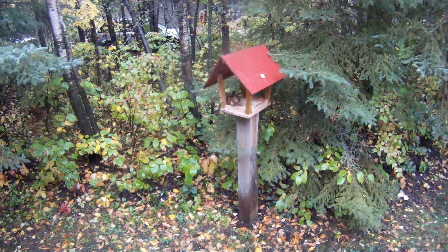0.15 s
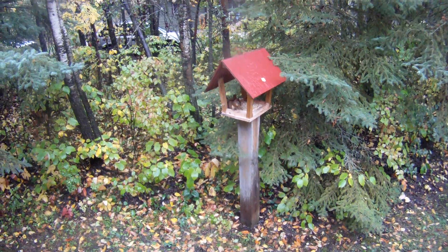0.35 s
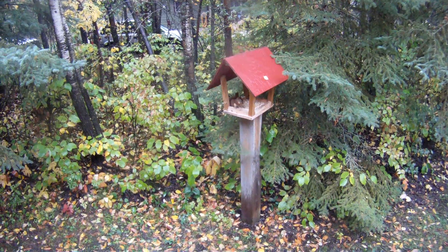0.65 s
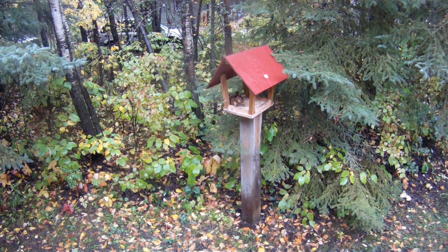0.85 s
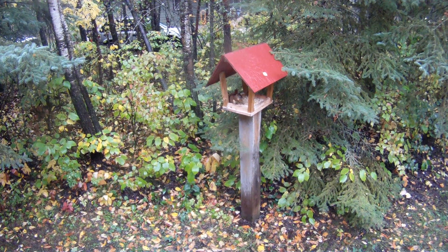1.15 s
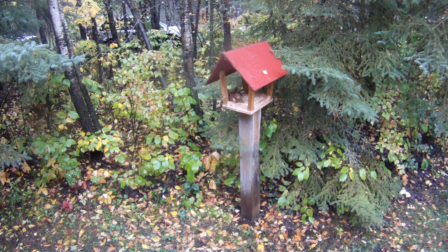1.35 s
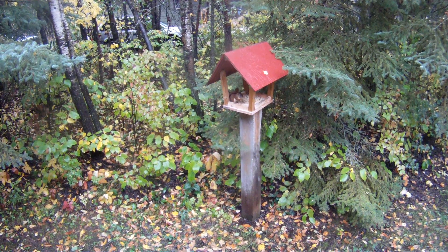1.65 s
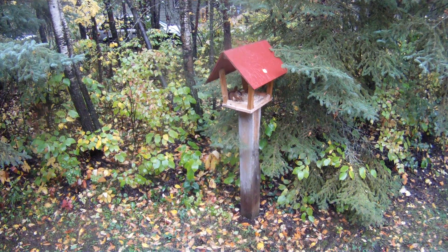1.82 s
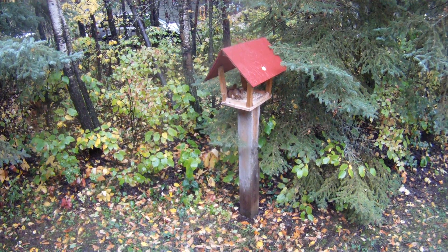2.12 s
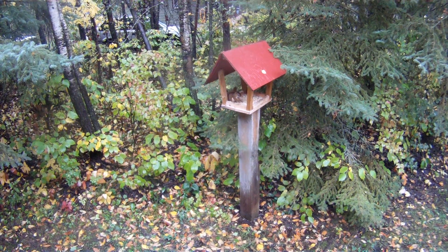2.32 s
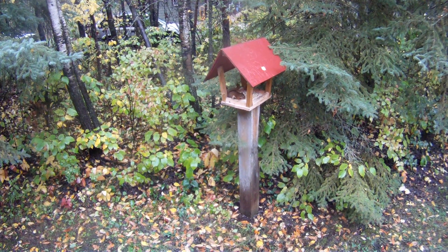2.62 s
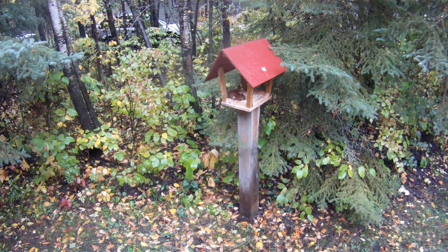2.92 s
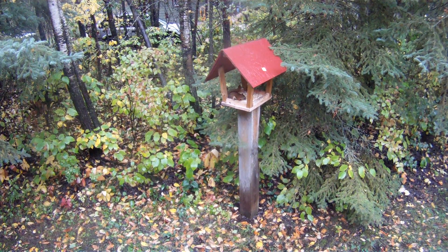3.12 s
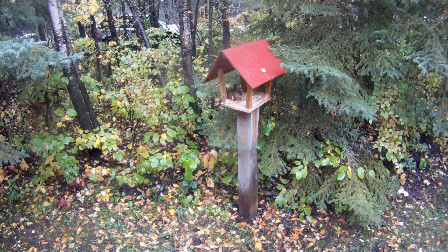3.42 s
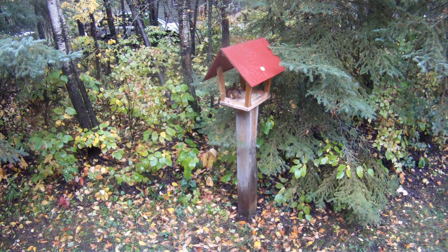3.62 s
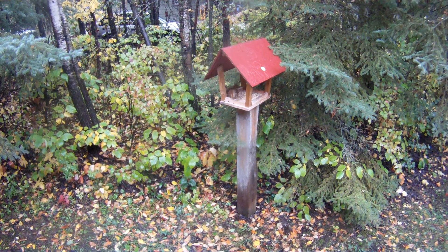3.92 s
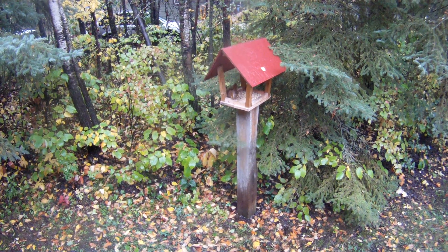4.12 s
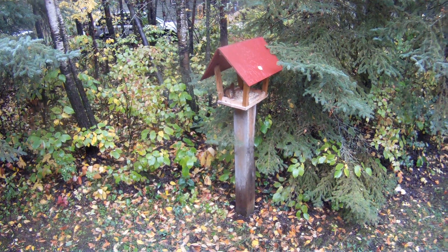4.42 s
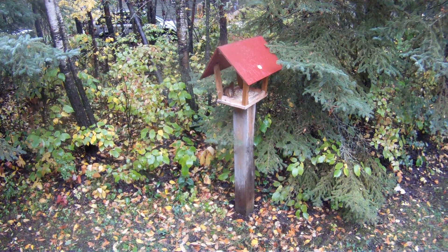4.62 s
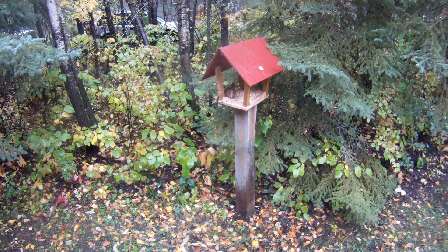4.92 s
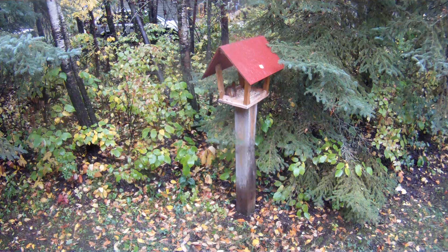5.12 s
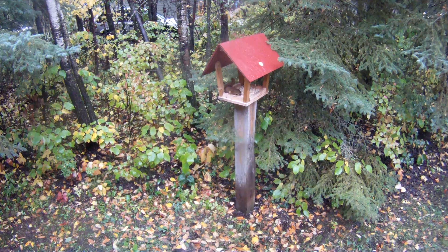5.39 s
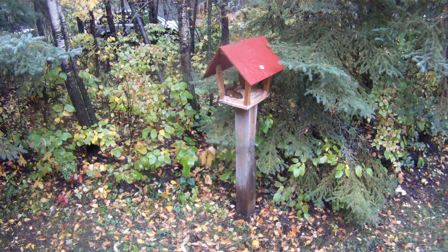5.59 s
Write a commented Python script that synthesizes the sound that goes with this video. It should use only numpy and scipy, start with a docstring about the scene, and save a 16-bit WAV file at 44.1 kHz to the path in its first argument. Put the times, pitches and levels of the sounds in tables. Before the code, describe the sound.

Light rain falls in a wooded yard for nearly six seconds, a soft, even hiss in the distance with fine patter nearer. Close to the small sheltered microphone, irregular drips tap leaves and wood with short, bright, wet ticks, a couple ringing briefly. Stronger taps come at about 0.3, 1.2, 2.2 and 3.9 seconds. At 1.2 seconds a heavy drop also hits the microphone housing with a short, dull thud. Between 2.3 and 3 seconds something small crackles close by in about five quick, sharp bursts, the last being the loudest sound. At about 3.7 seconds a bird gives one pure whistle, rising then falling, under half a second long. Lighter drips continue to the end. A very faint, low electrical hum lies beneath everything, and the treble has a slightly gritty, metallic edge.

```python
"""A wooded yard in light rain, heard from a small camera's microphone under cover. Close by, drips tap leaves
and wood, a heavy drop hits the housing and something small crackles in short bursts. Drops patter in the
middle distance and merge to a hiss far off; a bird whistles, and a faint mains hum lies below.
The camera samples slowly and holds each sample, so everything is mirrored into the treble."""
import sys
import numpy as np
from scipy import signal
from scipy.fft import rfft, irfft
from scipy.io import wavfile
from scipy.ndimage import uniform_filter1d

SR = 44100
rng = np.random.default_rng(int(sys.argv[2]) if len(sys.argv) > 2 else 0)


def inscribe(sig):
    """Save sig as 16-bit PCM at rate SR to the path in sys.argv[1].

    A 1-D sig is mono; a 2-D sig holds one channel per row.
    Samples are clipped to [-1, 1] before scaling.
    """
    pcm = np.round(np.clip(np.atleast_2d(sig).T, -1, 1) * 32767)
    wavfile.write(sys.argv[1], SR, pcm.astype(np.int16))


N = 253575

# Modes of the leaves and wood that a drop rings: pitch_hz, t60_s, pitch_spread
SURFACE_MODES = [(722, 0.029, 0.064), (1076, 0.03, 0.045), (1870, 0.021, 0.08), (2237, 0.018, 0.043),
                 (3103, 0.022, 0.089), (4810, 0.01, 0.092)]


def undb(db):
    return 10 ** (np.asarray(db) / 20)


def walk(rate_hz):
    """Random levels held 1 / rate_hz s and smoothed twice; spread near 1."""
    hold = int(SR / rate_hz)
    steps = np.repeat(rng.standard_normal(N // hold + 1), hold)
    return 1.46 * uniform_filter1d(uniform_filter1d(steps, hold), hold)[:N]


def add_ring(out, start_s, hz, db, t60, rise_s=.00022, phase=0):
    """Adds a ring that swells and dies away; 0 Hz at phase pi / 2 gives its bare envelope."""
    start = int(start_s * SR)
    t = np.arange(min(int(t60 * SR), N - start)) / SR
    shape = np.minimum(t / rise_s, 1) * np.exp(-np.log(1000) * t / t60)
    out[start:start + len(t)] += undb(db) * shape * np.sin(2 * np.pi * hz * t + phase)


def near_drips(contact_s=.0009, pair_db=-8, tick_db=-6, splash_db=-8, pivot_hz=2210, scatter_db=2.5):
    """Close drips: the struck spot's note, a tick and a splash; each mode rings as a pair that beats."""
    # start_s, level_db, spot_hz, spot_t60_s, modes_relative_db, tilt_db_per_octave, wet_relative_db
    drips = [(0.217, -41.5, 4700, .008, -7, 4, 8), (0.227, -39.5, 3040, .006, -13, -7, 14),
             (0.2904, -23.5, 4420, 0.0089, -7.5, 2, 6.5), (0.357, -45, 544, 0.097, -12, -5, -2),
             (0.442, -47.5, 1100, 0.027, -2, 0, 19), (0.816, -41.5, 1970, 0.036, -10, 0, 6),
             (1.07, -33.5, 2155, 0.03, -9, 1, -12), (1.149, -33, 4100, 0.0074, -17, 7, 3),
             (1.173, -29.5, 731, 0.056, -1.5, -1.5, -15), (1.175, -21.5, 2260, 0.015, -18, -3, -25),
             (1.2195, -24.5, 2280, 0.011, -9, -3.5, 4.5), (1.5225, -37, 2700, 0.016, -14, 3, 6),
             (1.6615, -45, 2250, 0.014, -2, -5.5, 14), (1.889, -40.5, 3050, 0.012, -8, 1, 8),
             (1.982, -40.5, 2900, 0.025, -4, -3, 0), (2.021, -35, 2970, 0.016, -8, 1, -2),
             (2.027, -36, 3170, 0.017, -12, 4, 6), (2.1325, -40, 2260, .015, -15, -5, -6),
             (2.241, -17.5, 2430, 0.012, -12.5, 2, -9), (2.325, -43, 794, 0.044, 2, 0, 3),
             (2.351, -43, 3040, 0.022, -4, -1, 12), (2.3607, -42.5, 3190, 0.22, 6, -2, 3),
             (2.394, -32.5, 1920, .014, -9.5, 6, 0), (2.4175, -31.5, 3360, 0.0081, -11.5, 7, 3),
             (2.521, -45.5, 3100, 0.013, -7, -4, 18), (2.575, -35.5, 3000, 0.0087, -13, 8, -4),
             (2.595, -37.5, 734, 0.043, -5, 10, 13.5), (2.94, -18, 4580, .012, -28, 3, -25),
             (3.101, -35, 2950, 0.015, -8.5, 9, -2), (3.201, -41, 3130, 0.014, -10, 0, 11),
             (3.219, -44, 1070, .025, -2.5, 6, 9), (3.35, -32, 5650, 0.015, -5.5, 0, 15.5),
             (3.473, -45.5, 3160, 0.023, -8, 2, 17), (3.583, -36.5, 2770, 0.012, -17, 6, -5),
             (3.642, -45, 1750, 0.044, -1.5, 6, 10), (3.722, -33, 3110, 0.013, -12, 5, 4),
             (3.9295, -26.5, 1146, 0.036, -16, 0, -10), (3.9305, -21.5, 2980, 0.013, -14.5, 2, -4),
             (4.199, -36, 4750, 0.012, -16, -3, -7), (4.655, -45.5, 3185, 0.16, 8.5, -2, 7),
             (4.734, -45, 3060, .02, -8, 9, 6), (5.277, -39, 3970, 0.012, -17, 9, 5),
             (5.349, -48.5, 1280, 0.13, -2, -9, 8), (5.422, -41.5, 660, 0.02, -18, -2, -2),
             (5.476, -46, 2140, .05, -8.5, -12, 1), (5.53, -47.5, 400, .09, -18, 1, 0),
             (5.546, -34.5, 3230, 0.014, -4.5, -2, 3), (5.599, -41, 3130, .018, -14, 1, 12)]
    # How readily each surface mode answers: gain_db
    mode_gains = [-7.5, -3, -8, 0.5, 1, -2.5]
    out, splash = np.zeros(N), np.zeros(N)
    for s, db, spot_hz, spot_t60, modes_db, tilt, wet_db in drips:
        add_ring(out, s, spot_hz, db, spot_t60, contact_s)
        for (hz, t60, spread), gain_db in zip(SURFACE_MODES, mode_gains):
            detune, side, phase, size = rng.standard_normal(4)
            mode_db = db + modes_db + gain_db + tilt * np.log2(hz / pivot_hz) + scatter_db * size
            ring_s = .97 * t60
            pair_hz = hz * (1 + 2 * spread * np.sign(side))
            add_ring(out, s, hz * (1 + spread * detune / 4), mode_db, ring_s, contact_s)
            add_ring(out, s, pair_hz, mode_db + pair_db, ring_s / 2, contact_s, 3 * phase)
        add_ring(out, s + contact_s / 2, hz=2800, db=db + wet_db + tick_db, t60=.002, rise_s=.0001)
        add_ring(splash, s, 0, db + wet_db + splash_db, t60=.011, rise_s=contact_s, phase=np.pi / 2)
    highpass = signal.butter(2, 1200, "highpass", fs=SR, output="sos")
    return out + splash * signal.sosfilt(highpass, rng.standard_normal(N))


def housing_thud():
    """A heavy drop on the housing, right at the microphone; it pushes inward first."""
    # start_s, pitch_hz, level_db, t60_s
    thuds = [(1.218, 280, -18, .008)]
    out = np.zeros(N)
    for s, hz, db, t60 in thuds:
        add_ring(out, s, hz, db, t60, rise_s=.0015, phase=np.pi)
    return out


def crackle(t60=.012, upper_hz=4650, upper_t60=.01, later_db=-3.5, tail_db=-16, tail_t60=.09):
    """Fading runs of quick snaps ring two resonances; a rustle in two bands near them trails off."""
    # start_s, first_snap_db, pitch_hz, upper_relative_db, gap_s, fade_db_per_s, length_s
    bursts = [(2.289, -19.5, 2960, -2.5, 0.0046, 400, 0.013), (2.425, -28.5, 3280, -8, 0.0068, 270, .01),
              (2.588, -18.5, 3290, -4.5, .0034, 650, 0.027), (2.749, -18, 3065, -6, .0033, 480, 0.032),
              (2.9409, -9.5, 3110, -6, .0035, 700, .011), (2.961, -30, 3170, -12, .005, 900, .006)]
    # Scatter from snap to snap: gap_share, size_db, pitch_share
    snap_scatter = .2, 2.1, 0.029
    gap_share, size_db, pitch_share = snap_scatter
    out, rustle = np.zeros(N), np.zeros(N)
    chances = rng.standard_normal((len(bursts), 12, 4))
    chances[:, 0, :2] = 0  # each first snap keeps its time and size
    for (start, first_db, hz, upper_db, gap, fade, length), chance in zip(bursts, chances):
        for k, (late, size, detune, upper) in enumerate(chance[:int(length / gap) + 1]):
            s = start + gap * (k + gap_share * late)
            db = first_db - fade * gap * k + later_db * (k > 0) + size_db * size
            add_ring(out, s, hz * (1 + pitch_share * detune), db, t60, rise_s=.00057)
            ring_db = db + upper_db + size_db * upper
            add_ring(out, s, upper_hz * (1 + pitch_share * upper), ring_db, upper_t60, rise_s=.0013)
            add_ring(rustle, s, 0, db + tail_db, tail_t60, rise_s=.001, phase=np.pi / 2)
    noise = rng.standard_normal(N)
    low, high = [signal.sosfilt(signal.butter(2, edges_hz, "bandpass", fs=SR, output="sos"), noise)
                 for edges_hz in ((2800, 3570), (4200, 4640))]
    return out + rustle * (low + .37 * high)


def bird(waver_db=.8, echoes=((.023, -19), (.068, -28))):
    """A pure gliding whistle, slightly unsteady in level; trunks and a wall echo it (delay_s, gain_db)."""
    # The calls: start_s, level_db
    calls = [(3.69, -32), (5.685, -50)]
    # Course of one call: time_s, pitch_hz, relative_db
    contour = [(0, 1124, -35), (.058, 1373, -6), (0.101, 1545, 0), (.13, 1578, 0.5), (0.159, 1532, -5.5),
               (.21, 1252, -2.5), (.245, 1150, -17), (.3, 1180, -9.5), (.34, 1169, -16), (.4, 1172, -60)]
    s, pitch_hz, shape_db = np.transpose(contour)
    t, out = np.arange(N) / SR, 0
    for start, db in calls:
        hz = uniform_filter1d(np.interp(t - start, s, pitch_hz), SR // 50)
        sounding = (t > start) * (t <= start + s[-1])
        gain = undb(db + np.interp(t - start, s, shape_db) + waver_db * walk(40)) * sounding
        out = out + np.sqrt(2) * gain * np.sin(2 * np.pi * np.cumsum(hz) / SR)
    return out + sum(undb(db) * np.interp(t - delay_s, t, out) for delay_s, db in echoes)


def patter(count=700, base_db=-58, smallest=1 / 30):
    """Small drops in the middle distance, each briefly ringing the surface modes in its own mix."""
    out = np.zeros(N)
    for when, faintness, *mix in rng.random((count, 14)):
        drop_db = base_db - 3.2 * np.log(smallest + faintness)  # many faint, few loud
        for (hz, t60, spread), miss, detune in zip(SURFACE_MODES, mix[:6], mix[6:]):
            pitch_hz = hz * (1 + 6.3 * spread * (detune - .5))
            add_ring(out, when * N / SR, pitch_hz, drop_db - 14 * miss, t60 / 2)
    return out


def far_rain(level_db=-52.5, swell_db=.4, flicker_db=1.5):
    """Countless far drops merge to a hiss: half-octave bands that swell together and flicker alone."""
    # Colour of the hiss: frequency_hz, relative_density_db
    spectrum = [(25, -4), (90, -2), (280, -6.5), (380, -4.5), (710, -2), (930, -11.5), (1150, -11),
                (1600, -10), (2250, -8.5), (2600, -8), (3100, -4.5), (3800, -11.5), (4700, -10),
                (6000, -20)]
    # Rise and fall of the shower, taken about its mean: time_s, treble_db
    shower = [(0.0, -55.5), (1.81, -55.5), (2.45, -54.5), (2.69, -55.5), (3.33, -56.5), (3.84, -54.5),
              (4.05, -55.5), (5.75, -55)]
    f = np.fft.rfftfreq(N, 1 / SR) + 1e-3
    hz, db = np.transpose(spectrum)
    coloured_noise = undb(np.interp(np.log(f), np.log(hz), db)) * rfft(rng.standard_normal(N))
    s, treble_db = np.transpose(shower)
    shower_db = np.interp(np.arange(N) / SR, s, treble_db - np.mean(treble_db))
    out, swell = 0, walk(2.37)
    for octave in np.arange(4, 13.5, .5):  # band centre at 2 ** octave Hz
        share = np.clip(1 - 2 * np.abs(np.log2(f) - octave), 0, 1)
        gain_db = swell_db * swell + flicker_db * walk(24.905) + shower_db * (octave > 10)
        out = out + undb(gain_db) * irfft(coloured_noise * share, N)
    return out * undb(level_db) / np.std(out)


def mains_hum(hz=119.5, level_db=-70.5, waver_db=2.4):
    """Faint mains hum that wavers a little in level."""
    gain = undb(level_db + waver_db * walk(3.2))
    return np.sqrt(2) * gain * np.sin(2 * np.pi * hz * np.arange(N) / SR)


def scene():
    """The yard as it reaches the one microphone."""
    return (far_rain() + patter() + near_drips() + housing_thud() + crackle() + bird() + mains_hum())[None]


def record(dry, camera_hz=12000, top_hz=15280):
    """The camera samples slowly; holding each sample four steps mirrors the sound around camera_hz."""
    samples = signal.resample_poly(dry, camera_hz, SR, axis=1)
    held = signal.resample_poly(np.repeat(samples, 4, axis=1), SR, 4 * camera_hz, axis=1)
    lowpass = signal.ellip(10, .2, 70, top_hz, fs=SR, output="sos")
    return signal.sosfilt(lowpass, held[:, :N])


dry = scene()
out = record(dry)
inscribe(out)
```